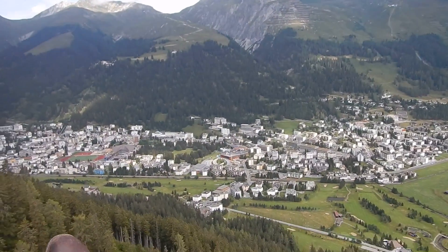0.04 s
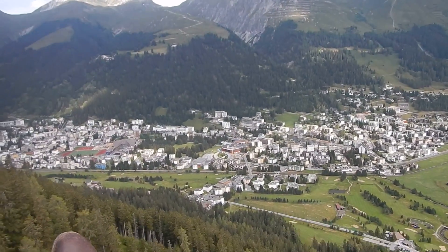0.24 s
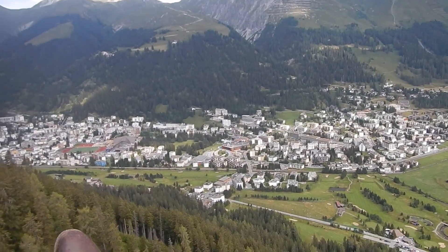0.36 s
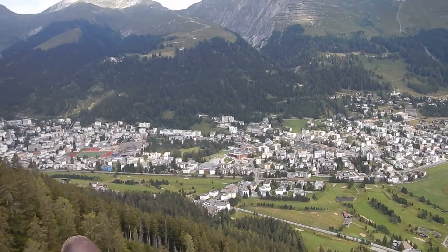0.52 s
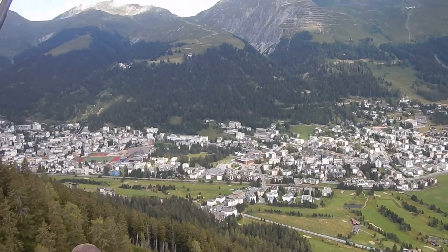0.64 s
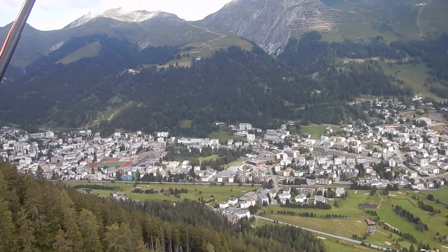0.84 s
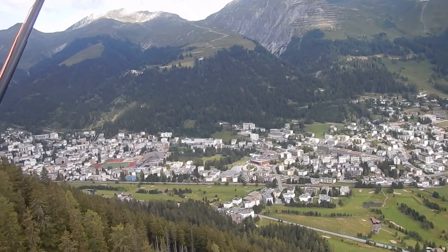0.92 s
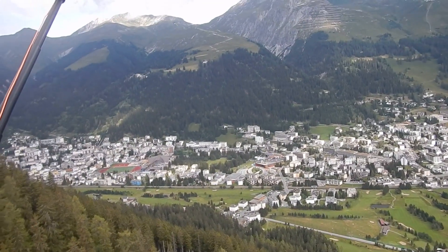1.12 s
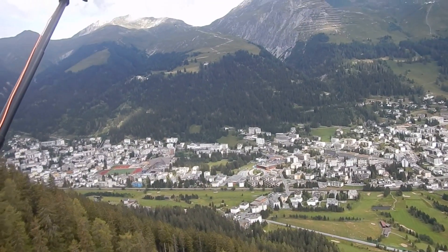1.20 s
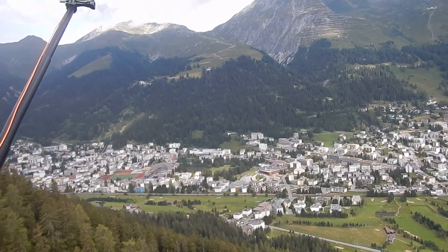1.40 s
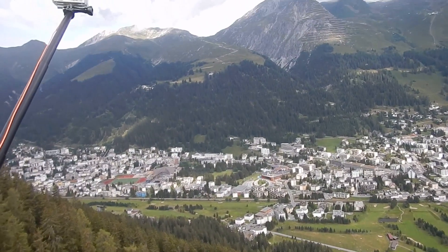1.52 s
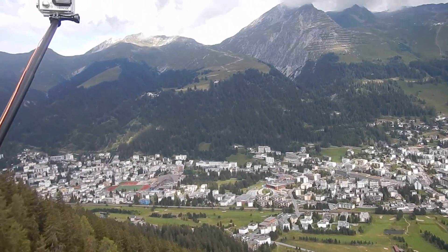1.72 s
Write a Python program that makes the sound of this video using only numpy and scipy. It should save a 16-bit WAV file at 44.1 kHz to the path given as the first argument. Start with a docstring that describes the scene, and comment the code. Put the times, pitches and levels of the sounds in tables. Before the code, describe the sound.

Wind rushes and hisses steadily past a small camera carried through the open air, rumbling on the microphone. A hand bumps the case twice with sharp clicks, then twice more softly, and the wind carries on.

```python
"""Up in the open air, wind streams past a small camera carried in flight: a broad rush, a hiss,
an airy ring from the microphone ports and eddies buffeting them. A hand bumps the case four times,
the microphone overloads with sharp clicks on the hardest bumps, and the gear gives a few light ticks.
The loud bumps push the camera's gain control down, so the wind ducks and swells back."""
import sys
import numpy as np
from scipy import signal
from scipy.fft import rfft, irfft
from scipy.io import wavfile
from scipy.ndimage import uniform_filter1d

SR = 44100
rng = np.random.default_rng(int(sys.argv[2]) if len(sys.argv) > 2 else 0)


def dump_mix(stems):
    """Bounce the given channels to the path in sys.argv[1] as a 16-bit WAV at rate SR."""
    frames = np.atleast_2d(stems).T  # one column per channel
    limited = np.clip(frames, -1, 1)  # hard clip at full scale
    pcm = np.round(limited * 32767).astype(np.int16)
    wavfile.write(sys.argv[1], SR, pcm)


N = 77175

# Tone of the rushing air. Each row: frequency in Hz, relative level in dB.
RUSH_EQ = [(40, 6), (110, 1), (200, -3), (310, -2.5), (500, -8), (750, -11), (1000, -13), (1500, -17.5),
           (2200, -23.5), (3000, -34.5), (6000, -62)]
# Fader ride on the rush. Each row: time in seconds, level in dB.
RUSH_RIDE = [(0, -31), (.2, -32.5), (.4, -31), (.6, -35.5), (.9, -32.5), (1.1, -32), (1.4, -31),
             (1.75, -32)]
# Tone of the hiss. Each row: frequency in Hz, relative level in dB.
HISS_EQ = [(1000, 9), (2400, -2.5), (3300, 5), (4500, 2), (5800, -4), (8000, -8.5), (9000, -8.5),
           (10000, -18.5), (15500, -23)]
# Fader ride on the hiss. Each row: time in seconds, level in dB.
HISS_RIDE = [(0, -46.5), (.2, -45.5), (.45, -46.5), (.65, -48), (.82, -49.5), (1.02, -47.5), (1.17, -47),
             (1.45, -49.5), (1.75, -49)]
# Airy resonances of the ports. Each row: pitch in Hz, width in Hz, relative level in dB.
PORT_RESONANCES = [(5350, 640, -5.5), (6740, 410, -1), (7526, 290, 0.5), (7890, 330, -1)]
# How hard the airflow rings the ports. Each row: time in seconds, level in dB.
PORT_RIDE = [(0, -54.5), (.3, -54.5), (.62, -56), (.82, -53), (.93, -56), (1.02, -52), (1.08, -58.5),
             (1.15, -53), (1.45, -57), (1.75, -55)]
# Tone of the buffeting. Each row: frequency in Hz, relative level in dB.
BUFFET_EQ = [(15, -23.5), (35, -15), (70, 5), (105, 2), (160, -7.5), (300, -30), (700, -41), (2000, -68)]
# Gusts that drive the buffeting. Each row: time in seconds, level in dB.
GUST_RIDE = [(0, -34), (.1, -29), (.2, -32.5), (.6, -40), (.95, -34.5), (1.1, -28.5), (1.25, -30),
             (1.36, -21.5), (1.5, -30.5), (1.75, -31.5)]
# Ticks and scuffs of the gear. Each row: time in seconds, peak in dB, pitch in Hz,
# rise and decay in seconds, left over right in dB.
GEAR_TICKS = [(0.49, -32.5, 6700, .002, .003, -1), (.528, -41, 5300, 0.0049, .005, -16),
              (0.558, -40, 6000, 0.0053, 0.0041, -2), (0.636, -39, 5530, 0.0086, 0.032, -12),
              (1.5374, -24.5, 5740, 0.00024, 0.00094, -8)]
# Microphone overload clicks. Each row: time in seconds, peak in dB, left over right in dB.
OVERLOAD_CLICKS = [(0.2385, -16, 5), (0.4315, -21, 1.5), (0.4382, -16.5, 5)]
# Tone of the overload clicks. Each row: frequency in Hz, relative level in dB.
OVERLOAD_EQ = [(300, -29), (1500, 20), (4000, 1), (8000, 3), (15500, -15)]
# Hand contacts, bunched into four bumps. Each row: time in seconds, level in dB,
# rise and decay in seconds, low cut and high cut in Hz, left over right in dB.
BUMP_HITS = [(0.2359, -3, 0.0029, 0.011, 104, 1330, -1.5), (0.242, -11, 0.0011, 0.0055, 202, 3980, -11),
             (.419, -9, 0.0056, 0.0096, 67, 278, 2), (0.43, 0, 0.0062, 0.014, 118, 640, -1),
             (0.439, -1.5, 0.0054, 0.013, 16, 700, 10), (0.462, -9, .007, 0.0041, 43, 820, -1),
             (0.713, -10, 0.0074, 0.009, 290, 555, -13), (.725, -15.5, .003, 0.0043, 54, 330, -8),
             (1.055, -9.5, 0.0081, 0.0072, 79, 724, -5)]
# Body of the case. Each row: pitch in Hz, width in Hz, relative level in dB.
CASE_RESONANCES = [(36.6, 26, 11.5), (85, 76, 5.5), (167.2, 69, 2), (246, 81, -4), (324, 98, -4),
                   (416, 42, -15), (587, 65, -17.5), (722, 42, -15), (962, 80, -15.5), (1270, 240, -30),
                   (2280, 990, -36.5)]
# Narrow notches in the camera's treble. Each row: centre in Hz, half-width in Hz, depth from 0 to 1.
CAMERA_NOTCHES = [(2505, 94, 1), (5060, 33, 1), (5690, 16, 0.8), (7610, 42, 1), (9650, 60, 0.86)]


def undb(db):
    """Decibels to gain."""
    return 10 ** (np.asarray(db) / 20)


def unit(x):
    """Scale to an rms of 1."""
    return x / np.sqrt(np.mean(x ** 2) + 1e-20)


def freqs():
    """Frequency of each spectral bin in Hz."""
    return np.maximum(np.arange(N // 2 + 1) * SR / N, .01)


def filtered(x, response):
    """Apply a frequency response."""
    return irfft(rfft(x) * response, N)


def eq(points):
    """EQ curve through (Hz, dB) points."""
    hz, db = np.array(points).T
    return undb(np.interp(np.log(freqs()), np.log(hz), db))


def resonance(hz, width):
    """Response of one damped mode, gain 1 at its centre."""
    f = freqs()
    return 1 / (1 + 1j * (f * f - hz * hz) / (f * width))


def ride(t, points):
    """Gain of a fader moving through (seconds, dB) points."""
    return undb(np.interp(t, *np.array(points).T))


def pan(db):
    """Constant-power gains that put the left db above the right."""
    return unit(undb(np.array([[db], [-db]]) / 2))


def stereo(mid, side, correlation):
    """Spread two noises to left and right; higher correlation narrows the image."""
    spread = np.sqrt(1 - correlation) * side * np.array([[1], [-1]])
    return (np.sqrt(1 + correlation) * mid + spread) / np.sqrt(2)


def air_noise(tone, correlation):
    """Steady stereo noise of the given tone, at an rms of 1."""
    mid, side = rng.standard_normal((2, N))
    return unit(filtered(stereo(mid, side, correlation), tone))


def wander(rate_hz):
    """Smooth random drift with a spread of 1."""
    slow = np.exp(-(freqs() / rate_hz) ** 2) * (freqs() > 1)
    return unit(filtered(rng.standard_normal(N), slow))


def short_power(x, window_s=.0047):
    """Running mean power of each channel."""
    return uniform_filter1d(x ** 2, int(window_s * SR))


def contact(age, rise, decay, correlation):
    """Rough contact force: a noise burst with a rounded rise up to age 0, then an exponential tail."""
    fade = (np.minimum(age, 0) / rise) ** 2 + np.maximum(age, 0) / decay
    envelope = np.exp(-np.minimum(fade, 60))
    force = rng.standard_normal((2, N)) * envelope
    for _ in range(3):  # even out the spectrum while keeping the burst short
        spectrum = rfft(force)
        force = irfft(spectrum / (np.abs(spectrum) + 1e-12), N) * envelope ** .5
    return stereo(unit(force[0]), unit(force[1]), correlation)


def port_ring(t):
    """The airflow rings the microphone ports, a faint airy band in the treble."""
    tone = sum(undb(db) * np.abs(resonance(hz, width)) ** 2 for hz, width, db in PORT_RESONANCES)
    return air_noise(tone, correlation=.39) * ride(t, PORT_RIDE)


def hiss(t, turbulence, flutter_db=.5):
    """The bright top of the wind, fluttering with the turbulence."""
    gain = ride(t, HISS_RIDE) * undb(flutter_db * turbulence)
    return air_noise(eq(HISS_EQ), correlation=.39) * gain


def rush(t, turbulence, flutter_db=.56):
    """The broad body of the airstream, a little to the right, fluttering with the turbulence."""
    gain = ride(t, RUSH_RIDE) * undb(flutter_db * turbulence)
    return air_noise(eq(RUSH_EQ), correlation=.72) * gain * pan(-2.5)


def buffet(t, flutter_db=5):
    """Eddies beat on the ports, mainly the left one, in a lumpy low rumble."""
    rumble = air_noise(eq(BUFFET_EQ), correlation=.3)
    eddies = unit(rumble * undb(flutter_db * wander(rate_hz=14)))
    return eddies * ride(t, GUST_RIDE) * pan(11.5)


def gear_ticks(t, width_hz=1700, high_cut_hz=7500):
    """Light contacts on the gear ring briefly in the treble."""
    high_cut = np.hypot(1, (freqs() / high_cut_hz) ** 8)
    out = 0
    for at, db, hz, rise, decay, pan_db in GEAR_TICKS:
        force = contact(t - at, rise, decay, correlation=1)
        ring = filtered(force, resonance(hz, width_hz) ** 2 / high_cut)
        out += ring / np.abs(ring).max() * undb(db) * pan(pan_db)
    return out


def overload_clicks(t, decay_s=.00059):
    """Sharp clicks of the microphone overloading: very short bursts placed on the hardest bumps."""
    out = 0
    for at, db, pan_db in OVERLOAD_CLICKS:
        burst = contact(t - at, decay_s / 2, decay_s, correlation=.34)
        click = filtered(burst, eq(OVERLOAD_EQ))
        out += click / np.abs(click).max() * undb(db) * pan(pan_db)
    return out


def hand_bumps(t):
    """Rough pushes ring the case, each with its own low and high cut, from dull thud to brighter knock."""
    modes = [undb(db) * np.abs(resonance(hz, width)) ** 1.527 for hz, width, db in CASE_RESONANCES]
    body = np.sqrt(sum(mode ** 2 for mode in modes))
    out = 0
    for at, db, rise, decay, low_cut_hz, high_cut_hz, pan_db in BUMP_HITS:
        low_cut = np.hypot(1, (low_cut_hz / freqs()) ** 2)
        high_cut = np.hypot(1, (freqs() / high_cut_hz) ** 4)
        force = contact(t - at, rise, decay, correlation=.5)
        thud = filtered(force, body / low_cut / high_cut)
        loudest_rms = np.sqrt(short_power(thud).max(axis=1, keepdims=True))
        out += thud / loudest_rms * undb(db) * pan(pan_db)
    return out


def scene():
    """A stereo bed of wind with the handling noise on top."""
    t = np.arange(N) / SR
    turbulence = wander(rate_hz=16)
    wind = rush(t, turbulence) + buffet(t) + hiss(t, turbulence) + port_ring(t)
    return wind + hand_bumps(t) + overload_clicks(t) + gear_ticks(t)


def record(dry):
    """The camera ducks fast on loud bumps and recovers slowly, rounds the peaks and trims the treble."""
    threshold_db, attack_s, release_db_per_s = -6.5, .014, 10
    ceiling, high_cut_hz = 1.05, 15850
    level_db = 10 * np.log10(np.maximum(short_power(dry).max(axis=0), 1e-12))
    over_db = np.maximum(level_db - threshold_db, 0)
    climb_db = release_db_per_s * np.arange(N) / SR
    duck_db = np.maximum.accumulate(over_db + climb_db) - climb_db  # catch each peak, then let go
    out = dry * undb(-uniform_filter1d(duck_db, int(attack_s * SR)))
    out = out / (1 + (out / ceiling) ** 4) ** (1 / 4)  # soft clip
    for hz, half_width, depth in CAMERA_NOTCHES:
        out = filtered(out, 1 - depth * resonance(hz, 2 * half_width))
    return signal.sosfilt(signal.ellip(10, .2, 80, high_cut_hz, fs=SR, output="sos"), out)


dry = scene()
out = record(dry)
dump_mix(out)
```